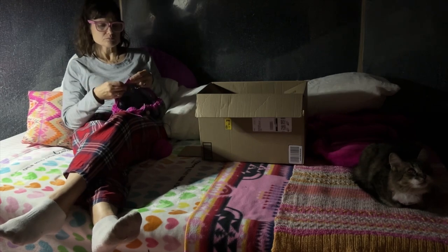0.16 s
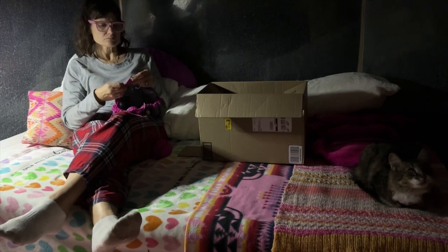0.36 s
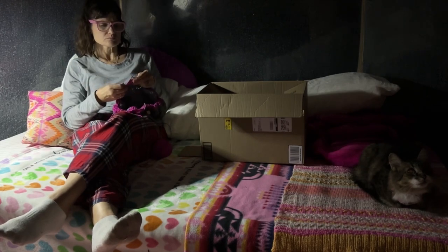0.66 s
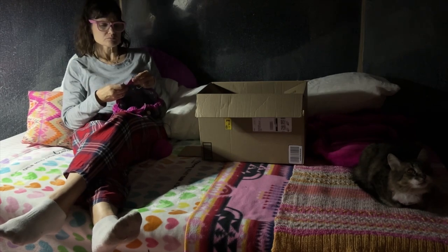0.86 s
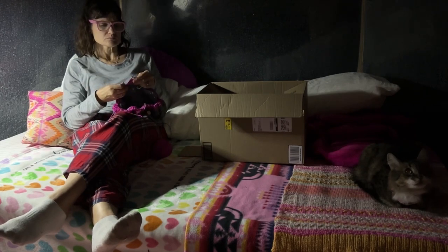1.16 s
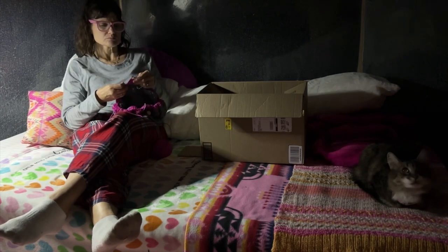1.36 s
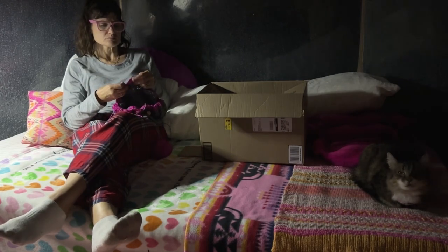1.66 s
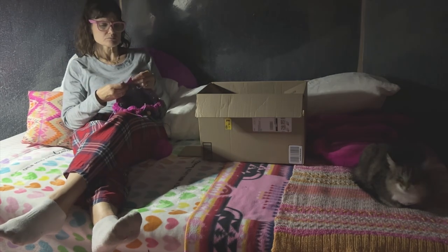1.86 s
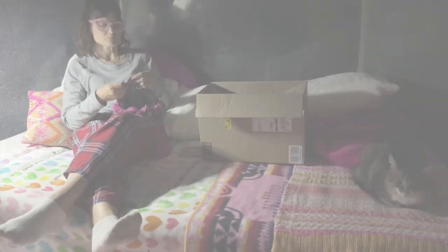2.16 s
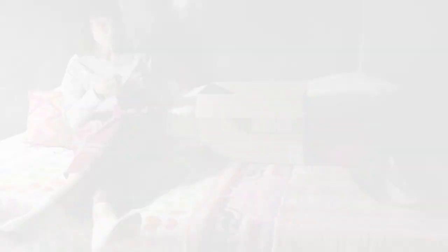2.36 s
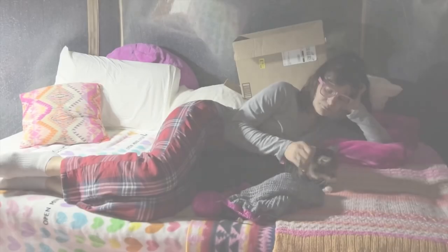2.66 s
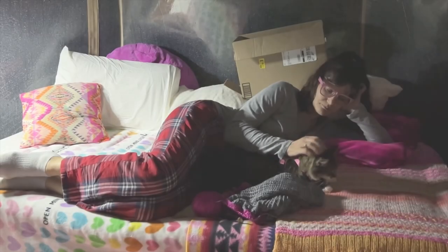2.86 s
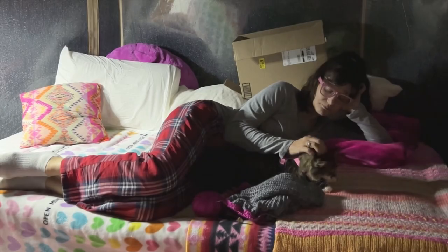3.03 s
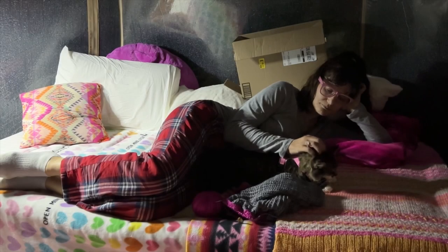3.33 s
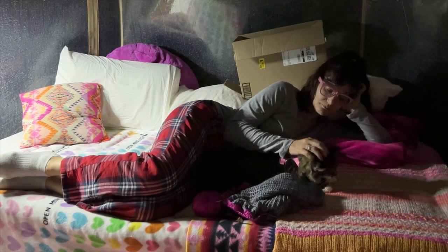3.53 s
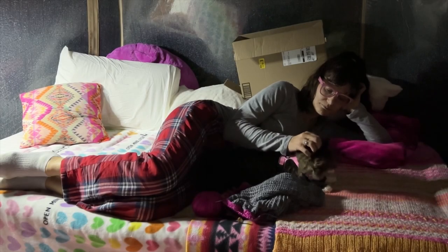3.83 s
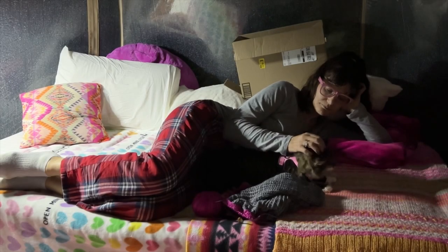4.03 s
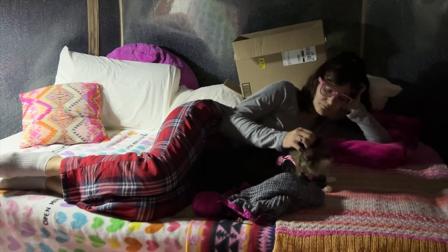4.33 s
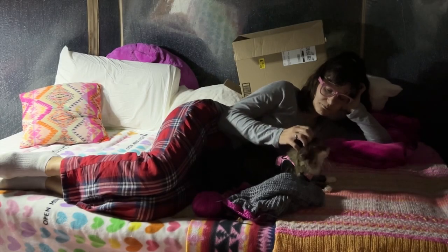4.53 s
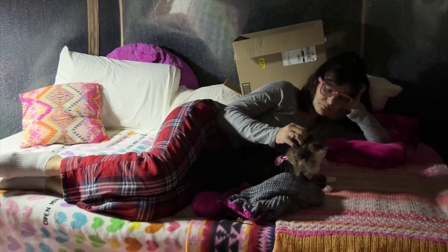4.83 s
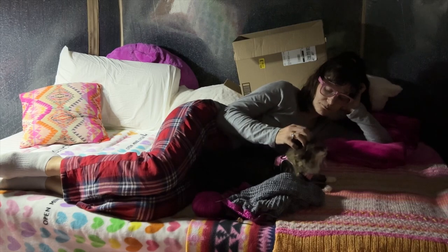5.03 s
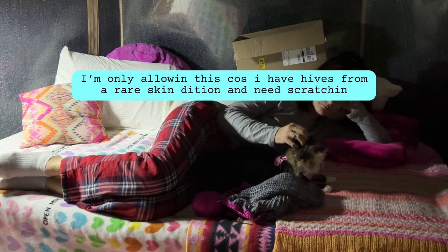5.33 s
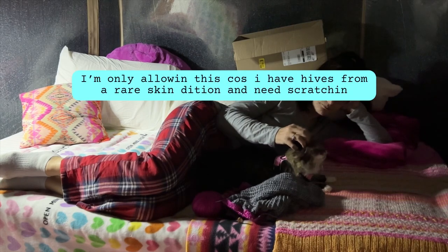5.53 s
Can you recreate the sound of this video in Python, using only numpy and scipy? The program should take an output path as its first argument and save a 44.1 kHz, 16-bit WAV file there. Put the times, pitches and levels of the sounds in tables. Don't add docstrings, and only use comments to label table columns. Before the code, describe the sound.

Close stereo pickup under stretched cloth: uneven raindrops, some deep and muffled, some thin and snappy, each with a very short fabric echo. Light patter and distant rain fill the gaps above a broad low rumble. The sound dips smoothly to almost nothing around the middle, then swells back with a wavering low hum beneath; strong single drops stand out in the later part.

```python
import sys
import numpy as np
from scipy import signal
from scipy.fft import rfft, irfft
from scipy.io import wavfile
from scipy.ndimage import uniform_filter1d

SR = 44100
rng = np.random.default_rng(int(sys.argv[2]) if len(sys.argv) > 2 else 0)


def volts(x):
    e = np.asarray(x, float) / 20
    return 10 ** e


def master(y):
    cut = np.clip(np.atleast_2d(y).T, -1, 1)
    pcm = np.round(cut * 32767)
    wavfile.write(sys.argv[1], SR, pcm.astype(np.int16))


N = 250929
CUT_S = 2.43

# t/s, peak level/dB, splash 4-12 kHz level/dB, ring f/Hz
MID_PANEL_DROPS = [(.06, -32, -25, 320), (.164, -36, -23, 200), (.686, -38, -33, 245),
                   (.859, -14, -23, 560), (1.037, -35.5, -20, 190), (1.151, -37, -19, 600),
                   (1.183, -24.5, -26, 390), (1.27, -34.5, -27, 277), (1.941, -39, -17.5, 270),
                   (2.256, -38.5, -13, 405), (2.545, -63, -41, 435), (2.738, -42.5, -19, 207),
                   (3.069, -37.5, -18, 277), (3.118, -34, -21, 244), (3.214, -39.5, -15, 390),
                   (3.613, -36, -12.5, 195), (3.711, -41, -15, 626), (3.847, -41, -29.5, 453),
                   (4.07, -31.5, -26, 248), (4.258, -37, -20, 209), (4.682, -17, -16, 450),
                   (4.929, -22, -42, 170), (5.166, -37, -40, 299), (5.484, -31.5, -25, 570)]
# t/s, peak level/dB, splash level/dB, ring f/Hz
SLOPE_DROPS = [(.094, -35, -13.5, 697), (.32, -36, -19, 560), (.62, -26.5, -20.5, 254),
               (1.217, -23.5, -40, 550), (1.548, -30, -16.5, 347), (1.679, -26, -28, 254),
               (1.774, -26.5, -23.5, 350), (2.11, -40.5, -9.5, 282), (2.152, -30.5, -17.5, 530),
               (2.242, -48, -29, 401), (2.957, -32, -23, 397), (3.256, -26.5, -18, 610),
               (3.318, -28, -19, 380), (3.541, -23.5, -20, 450), (3.675, -31.5, -19, 400),
               (3.761, -26, -12, 560), (4.182, -31.5, -29, 412), (4.288, -16, -23.5, 400),
               (4.372, -29, -22.5, 269), (4.7, -18, -21, 486), (4.906, -25.5, -13.5, 396),
               (5.01, -28.5, -19, 254), (5.266, -25, -17, 416), (5.397, -22, -20.5, 403),
               (5.52, -32, -18, 530)]
# t/s, peak level/dB, splash level/dB, ring f/Hz
LIGHT_SLOPE_DROPS = [(.289, -36, -15.5, 440), (.456, -35.5, -16, 640), (0.66, -41.5, -16.5, 440),
                     (.729, -46, -35, 754), (2.633, -54.5, -39, 199), (2.828, -44, -10, 563),
                     (3.87, -35, -23, 240), (3.968, -40.5, -12.5, 393), (4.119, -48, -21, 172),
                     (4.455, -35, -25, 377), (4.612, -37, -20, 349), (5.035, -34, -35, 397),
                     (5.069, -30.5, -24, 256)]
# t/s, peak level/dB, splash level/dB, ring f/Hz
SEAM_DROPS = [(.116, -28.5, -22, 242), (.481, -40, -16.5, 721), (.502, -29, -15.5, 440),
              (.872, -16, -16, 610), (.996, -29, -23, 685), (1.068, -21.5, -18.5, 179),
              (1.866, -41, -28, 503), (2.094, -43.5, -4.5, 674), (2.492, -56.5, -26, 266),
              (2.899, -27.5, -13.5, 1150), (3.035, -35.5, -15, 307), (3.226, -32.5, -36, 501),
              (3.466, -26.5, -10.5, 427), (4.35, -42, -30, 230), (4.776, -37.5, -11, 715),
              (4.798, -34.5, -17.5, 920), (4.962, -34.5, -13.5, 345), (5.184, -39.5, -7, 161),
              (5.221, -29.5, -13.5, 1390), (5.316, -30, -15.5, 583), (5.333, -31.5, -15, 1460),
              (5.544, -26, -30, 800), (5.642, -33.5, -12, 587)]
# t/s, peak level/dB, splash level/dB, ring f/Hz
SODDEN_DROPS = [(.204, -31.5, -44, 500), (.978, -19, -23.5, 530), (1.406, -25, -32, 433),
                (1.946, -40, -44, 253), (2.583, -49.5, -51, 600), (4.008, -20, -30.5, 387),
                (4.847, -32, -29, 209), (5.11, -37, -17, 288), (5.574, -39.5, -15, 580)]
# t/s, peak level/dB, splash level/dB, ring f/Hz
TAUT_DROPS = [(.345, -41, -16, 331), (.37, -25.5, -31.5, 179), (.814, -50, -19, 339),
              (.881, -20.5, -22, 170), (1.12, -41, -25.5, 1710), (2.702, -35.5, -17, 1630),
              (3.425, -22.5, -23, 510), (3.431, -31.5, -23, 540), (3.942, -42, -16, 151),
              (4.424, -34, -19, 1200), (5.246, -44, -12, 358), (5.297, -29, -35, 750),
              (5.374, -31.5, -27, 285)]
# thump 100-300 Hz level/dB, slap 1.8-4 kHz level/dB, extra echo level/dB
PLACE_COLOURS = [
    (-5.5, -14., 0.4),
    (-10.5, -14.5, -0.03),
    (-8, -15, -0.1),
    (-20, -12, -1),
    (-10, -18.5, 0.4),
    (-9.5, -7.5, -0.3),
]
# splash level/dB, slap level/dB, thump level/dB
USUAL_DROP_DB = (-18.5, -13.5, -12)


def large_drops(early_s=.0007):
    tables = (MID_PANEL_DROPS, SLOPE_DROPS, LIGHT_SLOPE_DROPS, SEAM_DROPS, SODDEN_DROPS, TAUT_DROPS)
    t_s, peak_db, splash_db, ring_hz = np.transpose(sum(tables, []))
    thump_db, slap_db, echo_db = np.repeat(PLACE_COLOURS, [len(rows) for rows in tables], axis=0).T
    usual_splash_db, usual_slap_db, usual_thump_db = USUAL_DROP_DB
    unfaded_db = peak_db - fader_db(t_s) - 6.0

    splash_db = splash_db - usual_splash_db
    slap_db = slap_db + 0.53 * splash_db + 0.0019 * (unfaded_db + 32)
    echoes_db = echo_db + np.clip(0.3 - 0.17 * (unfaded_db + 18.5), -1.5, 9.)
    sounds = strikes(splash_db, slap_db - usual_slap_db, thump_db - usual_thump_db, ring_hz, echoes_db)

    out = np.zeros((2, N + STRIKE_LEN))
    starts = np.round((t_s - early_s) * SR).astype(int).clip(0)
    for k, at in enumerate(starts):
        out[:, at:at + STRIKE_LEN] += volts(unfaded_db[k]) * sounds[:, k]
    return out[:, :N]


STRIKE_LEN = 12288
# f/Hz, level/dB
CLOTH_SPECTRUM = [(40, -15), (80, -10), (180, 2.5), (300, -2), (550, -1.5), (1400, -4), (1900, -7),
                  (2800, -13), (4800, -21.5), (9500, -25.5), (16000, -34.5)]
# f/Hz, width/Hz, level/dB
PANEL_MODES = [(170, 13, 2.5), (350, 180, 4.5), (546, 72, 3), (667, 55, 3), (1072, 200, -1.5)]
# f/Hz, t60/s
ECHO_DECAY = [(150, 0.12), (450, 0.077), (1300, .12), (3500, 0.18), (9000, 0.24)]


def strikes(splash_db, slap_db, thump_db, ring_hz, echoes_db, lag_s=0.005953):
    hz = np.fft.rfftfreq(STRIKE_LEN, 1 / SR)
    echoes = cloth_echoes(len(slap_db), hz)
    echo_tilt_db = read([(150, -4.5), (500, -1.5), (2000, 1.9), (6000, 5.0)], hz)
    echoes *= volts(echoes_db[:, None, None] + echo_tilt_db)

    tilt_db = np.array([
        read([(170, thump), (330, 0.012), (1500, 0.008), (2200, slap), (3800, slap), (5500, splash)], hz)
        for splash, slap, thump in zip(splash_db, slap_db, thump_db)])
    bending = 4j * np.pi * lag_s * 300 ** 1.5 / np.sqrt(hz + 100)
    start_phase_rad = 0.76
    spread = np.exp(bending + 1j * start_phase_rad - 2j * np.pi * hz * .0017)
    panels = 1 + sum((volts(db) - 1) * mode(hz, f, width) for f, width, db in PANEL_MODES)
    cloth = volts(read(CLOTH_SPECTRUM, hz)) * spread * panels

    spot_hz = ring_hz[:, None]
    pulse = cloth * volts(tilt_db) * (1 + 1.13 * mode(hz, spot_hz, 40 + 0.16 * spot_hz))
    mid = pulse * (1 + echoes[:, 0])
    side = pulse * np.sqrt(1 + volts(-2 * echoes_db))[:, None] * echoes[:, 1]
    cloth_peak = abs(irfft(cloth * (hz > 300) * (hz < 1500))).max()
    return irfft(ports(mid, side, hz)) / cloth_peak


def cloth_echoes(count, hz, gap_s=.0022, rise_s=0.00057, uneven_db=2.5, spray_hz=2500.):
    t = np.arange(STRIKE_LEN) / SR
    luck, sign, size = rng.random((count, 2, STRIKE_LEN, 3)).transpose(3, 0, 1, 2)
    dense = np.minimum((1 + t / .015) / (gap_s * SR), 1)
    size_gain = volts(uneven_db * np.minimum(-np.log(size + 1e-9), 1.5))
    grain = np.sign(sign - .5) * size_gain * (1 - np.exp(-(t / rise_s) ** 2))
    taps = grain * (luck < dense) / np.sqrt(dense)
    spray = grain * (luck < .15) / np.sqrt(.15)

    echoes = 0
    for k, (band_hz, t60_s) in enumerate(ECHO_DECAY):
        share = read([(f, float(j == k)) for j, (f, _) in enumerate(ECHO_DECAY)], hz)
        fall = volts(-60 * t / t60_s) + volts(-32.5 - 60 * t / .5)
        source = spray if band_hz > spray_hz else taps
        echoes = echoes + share * rfft(source * fall) / np.linalg.norm(fall)
    return echoes / np.sqrt(np.mean(abs(echoes[..., 100:1500]) ** 2, axis=(1, 2), keepdims=True))


# t/s, far rain level/dB
RAIN_LEVEL = [(0, -47.5), (.5, -53.5), (.8, -54), (1.2, -51), (1.5, -56), (2.05, -56.5), (2.4, -57),
              (2.85, -52), (3.35, -54), (3.9, -50.5), (4.4, -52), (4.6, -55.5), (4.85, -48), (5.15, -52.5),
              (5.69, -48)]


def fine_drops(count=16, per_s=140., spread_db=5.):
    tones_db = 9.6 * rng.standard_normal((3, count)) + [[-4.], [-2.5], [-3.]]
    ring_hz = 250 * 3.9 ** rng.random(count)
    sounds = strikes(*tones_db, ring_hz, np.full(count, -.5))
    size = volts(spread_db * np.minimum(rng.exponential(1, N), 2)) * (rng.random(N) < per_s / SR)
    patch = rng.integers(0, count, N)
    out = 0
    for k in range(count):
        hits = (size * (patch == k))[None]
        out = out + signal.fftconvolve(hits, sounds[:, k], axes=1)[:, :N]
    return volts(curve(RAIN_LEVEL) - 5.5) * evened(out)


# f/Hz, level/dB
WASH_SPECTRUM = [(18, -60), (35, -6.5), (75, 6.5), (145, -10.5), (400, -8), (760, -15.5), (1320, -15.5),
                 (3300, -21), (4200, -26.5), (7000, -31), (9500, -32), (16000, -44.5)]


def far_rain(patchy_db=3.5):
    frames, hz = N // 256 + 5, np.fft.rfftfreq(1024, 1 / SR)[:, None]
    a, b, c, d, patches = rng.standard_normal((frames, 513, 5)).T
    patches = evened(uniform_filter1d(uniform_filter1d(patches, 12, 0), 12, 1))
    over_usual_db = np.resize(curve(RAIN_LEVEL)[::256] + 53.5, frames)
    hiss_db = -0.07 * over_usual_db * read([(1200, 0.092), (3000, 0.84)], hz)
    z = ports(a + 1j * b, c + 1j * d, hz)
    z = z * volts(read(WASH_SPECTRUM, hz) + hiss_db + patchy_db * patches)
    wash = signal.istft(z, nperseg=1024, noverlap=768)[1][:, :N]
    return volts(curve(RAIN_LEVEL)) * evened(wash)


# t/s, level/dB
HUM_LEVEL = [(0, -64), (.25, -70), (.55, -76), (.9, -59), (1.05, -78), (1.22, -60), (1.45, -65.5),
             (2.4, -72), (2.5, -55.5), (3.2, -53.5), (3.6, -57.5), (4.2, -52), (4.45, -54.5), (4.72, -52.5),
             (4.85, -60.5), (5.2, -65), (5.55, -49.5), (5.69, -60)]


def hum(hz=67.84, width_hz=5.1, broad_hz=30.):
    z, f = rfft(rng.standard_normal(N)), np.fft.rfftfreq(N, 1 / SR)
    broad = evened(irfft(z / (1 + (2 * (f - hz) / broad_hz) ** 2), N))
    narrow = evened(irfft(z / (1 + (2 * (f - hz) / width_hz) ** 2), N))
    narrow /= np.sqrt(uniform_filter1d(narrow ** 2, 6000))
    return volts(curve(HUM_LEVEL)) * np.where(np.arange(N) < CUT_S * SR, broad, narrow)


def fader_db(t_s):
    before = t_s < CUT_S
    travel_s = np.where(before, 0.83, 0.9)
    open_db = np.where(before, 3, -0.04)
    bend = np.where(before, 0.9, 0.84)
    travel = np.clip(abs(t_s - CUT_S) / travel_s, 1e-4, 1)
    closed_db = -42
    return np.maximum(open_db + 20 * bend * np.log10(travel), closed_db)


# f/Hz, level/dB
PORT_SIDE = [(60, -15), (160, -15.5), (300, -11), (700, -0.7), (1300, -4), (3000, -4), (6500, -5),
             (8200, 0), (9900, -3.5), (10700, -20), (13500, -16.5), (14200, -2), (15600, -2.5),
             (16400, -18)]
# f/Hz, level/dB
PORT_MID = [(6500, -1), (7500, -2.5), (8250, -6), (9200, 1), (10200, -0.5), (11500, -5.5), (14800, -1),
            (15500, -12.5), (16500, -19)]
# f/Hz, share
PORT_LINK = [(100, .5), (600, .3), (2500, 0.56), (6000, .5), (8000, .3), (12000, .3)]


def ports(a, b, hz, turn_rad=1.0):
    link = np.clip(read(PORT_LINK, hz), 0, 1)
    side = volts(read(PORT_SIDE, hz)) * (link * np.exp(1j * turn_rad) * a + np.sqrt(1 - link ** 2) * b)
    mid = volts(read(PORT_MID, hz)) * a
    return np.array([mid + side, mid - side])


def mode(hz, at_hz, width_hz):
    return 1 / (1 + 2j * (hz - at_hz) / width_hz)


def read(points, hz):
    f, value = np.transpose(points)
    return np.interp(np.log(hz + 1), np.log(f + 1), value)


def curve(rows):
    return np.interp(np.arange(N) / SR, *np.transpose(rows))


def evened(x):
    return x / np.sqrt(np.mean(x ** 2) + 1e-20)


def scene():
    mix = large_drops() + fine_drops() + far_rain() + volts(3.5) * hum()
    return volts(fader_db(np.arange(N) / SR)) * mix


# f/Hz, level/dB
MASKING = [(2000, -32), (5000, -14), (8000, -7.5), (11000, -5), (14000, -3), (16000, -4)]


def thin_out(x, reach=90, attack_db=5.5, size=16):
    hz, _, z = signal.stft([x[0] + x[1], x[0] - x[1]], SR, "cosine", nperseg=2048)
    power = abs(z) ** 2
    around = uniform_filter1d(power.sum(0), reach, 0) * volts(2 * read(MASKING, hz))[:, None]
    band = uniform_filter1d(power, size, 1)[:, np.arange(len(hz)) // size * size]
    treble = power[0, hz > 4000].sum(0)
    attack = treble > volts(2 * attack_db) * np.roll(treble, 1)
    audible = (band > around) & (power > .12 * around * (hz > 5000)[:, None])
    kept = (audible & (hz < 15750)[:, None]) | attack
    kept &= (hz < 16500)[:, None]
    mid, side = signal.istft(z * kept, SR, "cosine", nperseg=2048)[1][:, :N]
    return np.array([mid + side, mid - side]) / 2


def roll_off(x):
    return signal.sosfilt(signal.butter(12, 16500, fs=SR, output="sos"), x)


def record(dry, rumble_hz=34.):
    bass_cut = signal.butter(4, rumble_hz, "high", fs=SR, output="sos")
    mix = thin_out(signal.sosfilt(bass_cut, dry))
    return roll_off(mix)


dry = scene()
out = record(dry)
master(out)
```